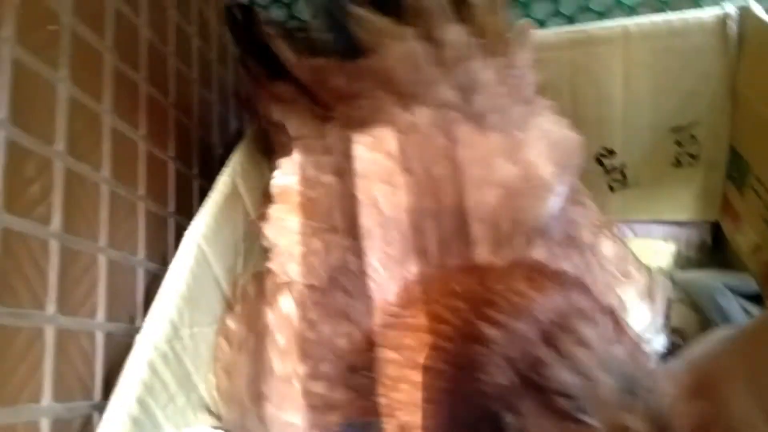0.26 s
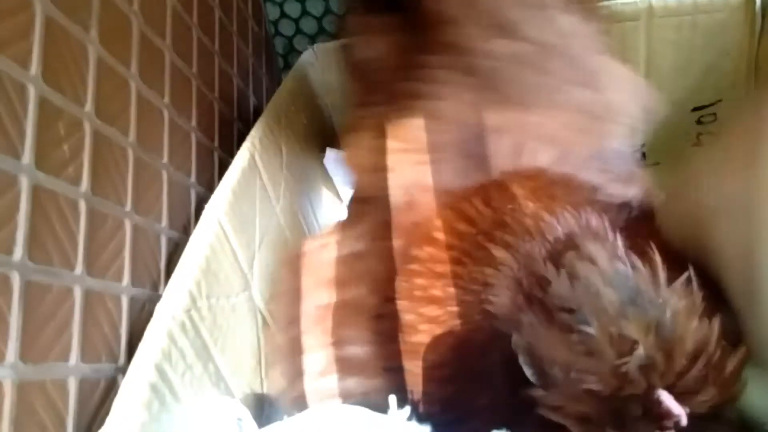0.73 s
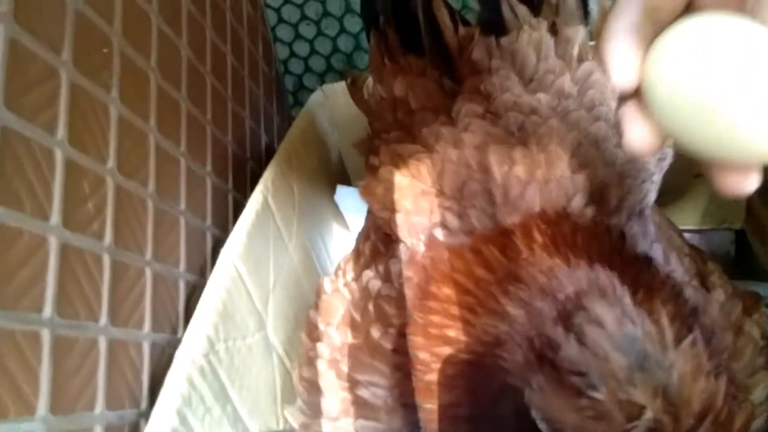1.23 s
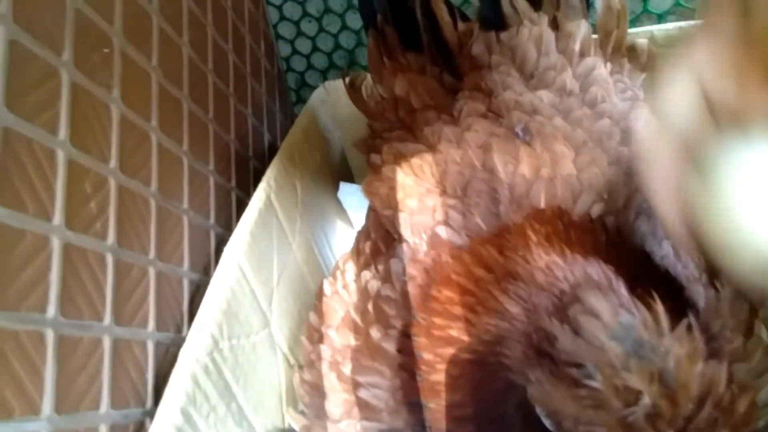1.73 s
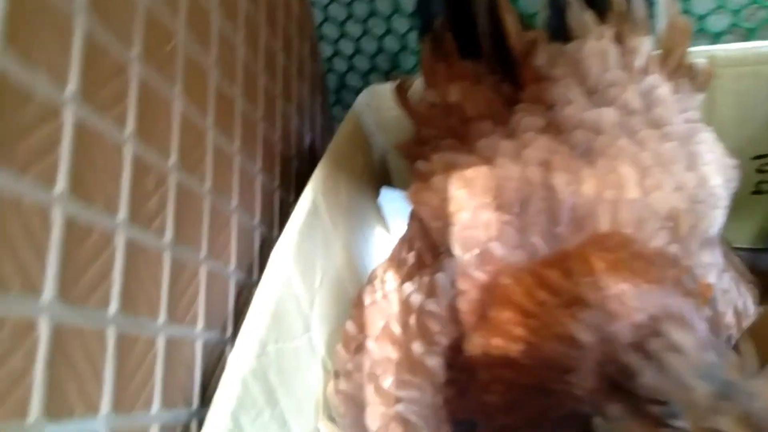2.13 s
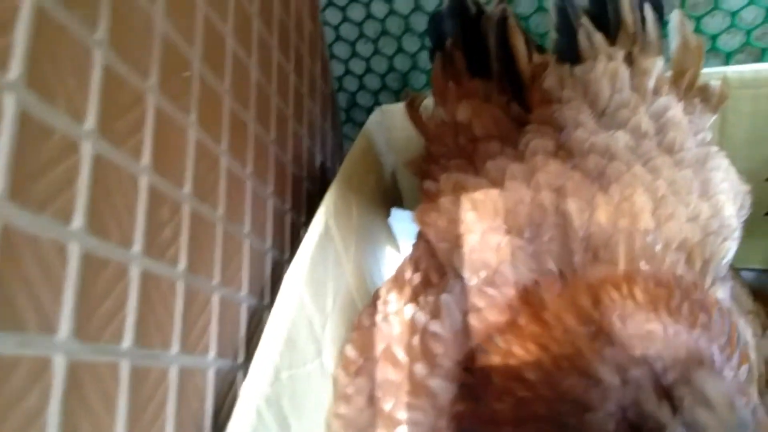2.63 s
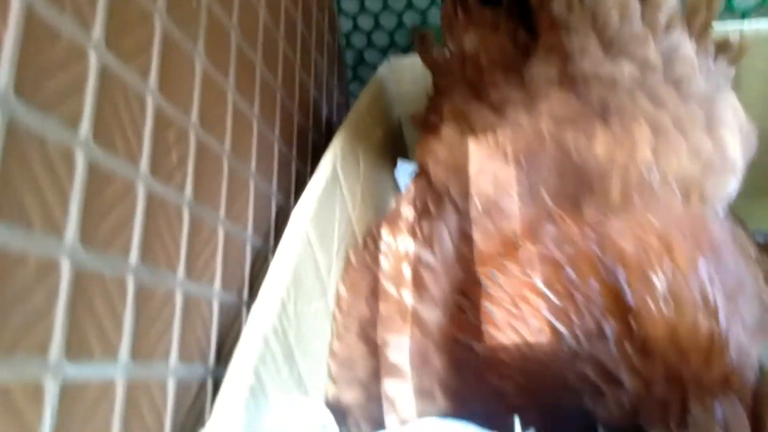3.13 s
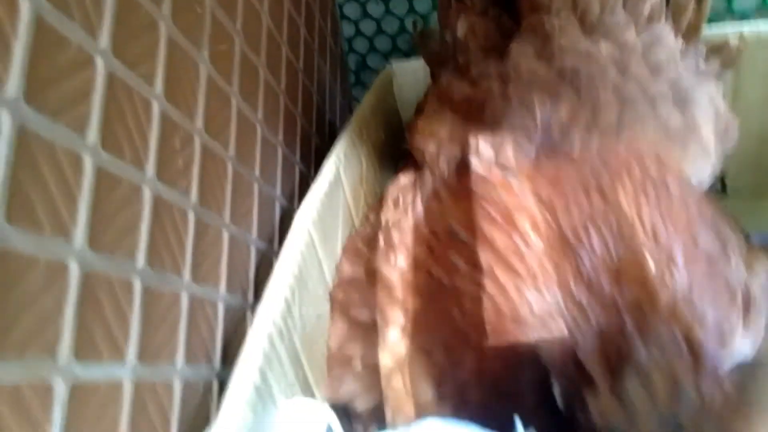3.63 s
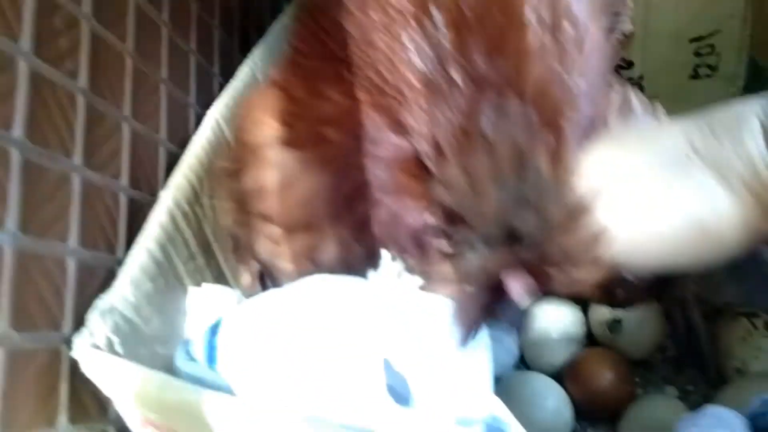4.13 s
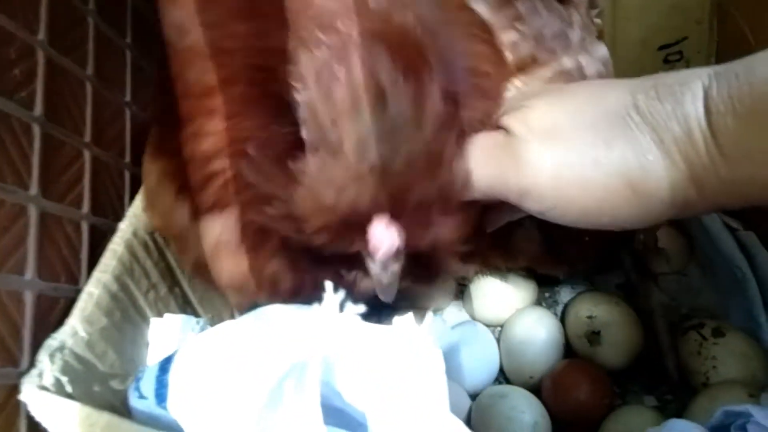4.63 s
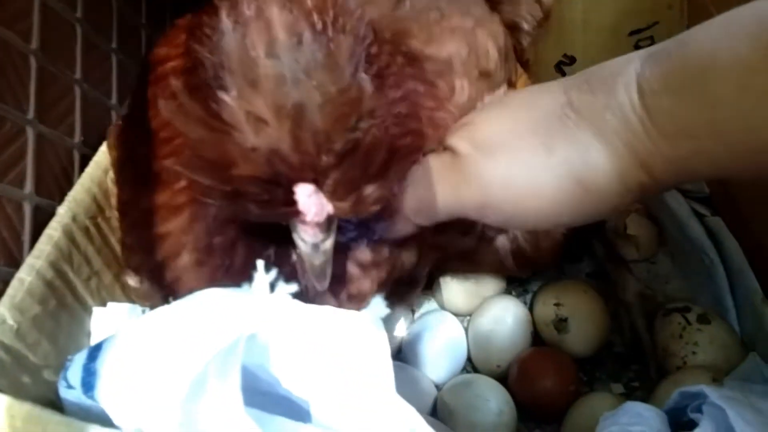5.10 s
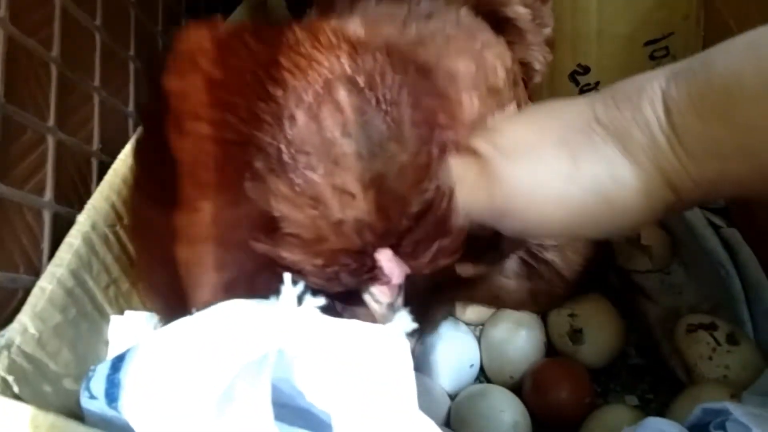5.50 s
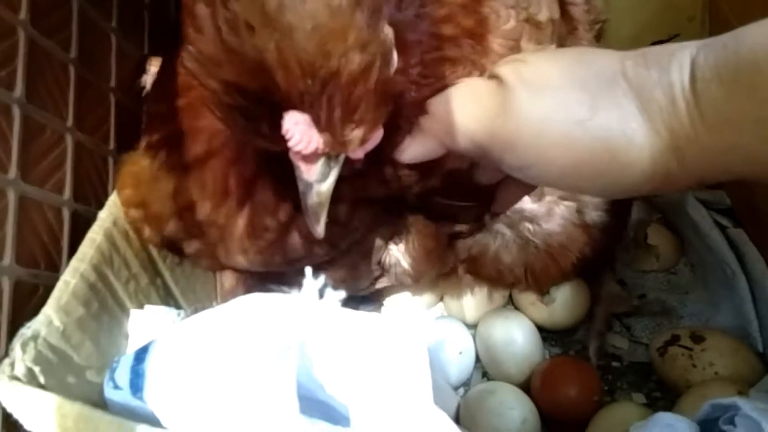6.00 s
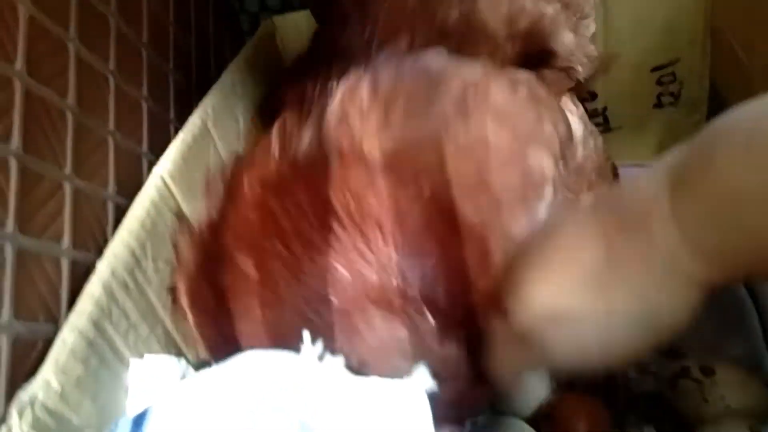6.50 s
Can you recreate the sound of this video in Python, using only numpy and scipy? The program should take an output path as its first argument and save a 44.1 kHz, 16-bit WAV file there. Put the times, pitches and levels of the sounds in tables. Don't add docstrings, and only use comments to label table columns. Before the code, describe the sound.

The sound opens mid-cluck: a hen very close, low and throaty, each short note growling, climbing clearly and dropping. Cicadas hiss high and steadily over traffic rumble and wavering motor hum throughout. From 0.2 s chicks whistle sharp gliding peeps, some loud, some soft; the box bumps dully at 0.2 and 0.85 s, and eggs and straw tick, sharply at 0.6. Distant dogs yap, clustering near 1.1 s as a faint cricket starts whirring in bouts. A far rooster gives one hoarse falling wail at 1.6-1.95 s, and traffic swells around 2.4 s. Clucks return at 2.5, 2.9 and 3.3 s, then from 3.9 s break to a higher top note. Peeps crowd in around 4.3-5.1 s. Dogs bark on, with a strong woof at 5.4 s and howls after 6 s. An egg tick sounds at 6.0 s; a last weak cluck and long warbled peep end it near 6.7 s.

```python
import sys
import numpy as np
from scipy import signal
from scipy.fft import rfft, irfft
from scipy.io import wavfile
from scipy.ndimage import uniform_filter1d, map_coordinates

SR = 44100
rng = np.random.default_rng(int(sys.argv[2]) if len(sys.argv) > 2 else 0)


def wav_out(sig):
    wavfile.write(sys.argv[1], SR, np.round(np.clip(np.atleast_2d(sig).T, -1, 1) * 32767).astype(np.int16))


def volts(x):
    e = np.asarray(x, float) / 20
    return 10 ** e


N = 297675
TIME = np.arange(N) / SR


def unit(x):
    return x / np.sqrt(np.mean(x ** 2) + 1e-20)


def along(points, hz):
    f, v = np.transpose(points)
    return np.interp(np.log(hz + 1), np.log(f + 1), v)


def wobble(rate, count=N):
    knots = rng.standard_normal(int(count * rate / SR) + 4)
    return map_coordinates(knots, [np.arange(count) * rate / SR])


def hiss(spectrum, patchy_db):
    hz, _, z = signal.stft(rng.standard_normal(N + 2048), SR, nperseg=2048)
    patches = uniform_filter1d(rng.standard_normal(z.shape), size=12, axis=0)
    patches = unit(uniform_filter1d(patches, size=3, axis=1))
    gain_db = patchy_db * patches + along(spectrum, hz)[:, None]
    return unit(signal.istft(z * volts(gain_db), SR, nperseg=2048)[1][:N])


def add(track, s, sound):
    start = round(s * SR)
    part, sound = track[max(start, 0):], sound[max(-start, 0):]
    part[:len(sound)] += sound[:len(part)]


def note(rows, fade):
    s, hz, db = np.transpose(rows)
    t = np.arange(s[0], s[-1] + fade, 1 / SR)
    to_edge = np.minimum(t - s[0], s[-1] + fade - t)
    edge = np.sin(np.pi / 2 * np.clip(to_edge / fade, 0, 1)) ** 2
    pitch_hz = uniform_filter1d(np.interp(t, s, hz), size=130)
    return pitch_hz, edge * volts(uniform_filter1d(np.interp(t, s, db), size=60))


def voice(hz, tract, tilt_db, uneven_db, count):
    k = np.arange(1, count + 1)[:, None]
    flicker = np.array([wobble(120, count=len(hz)) for _ in k])
    gains = volts(along(tract, k * hz) + tilt_db * np.log2(k) + uneven_db * flicker)
    lag = sum(np.arctan2(220 * k * hz, c ** 2 - (k * hz) ** 2) for c in (560, 920))
    overtones = gains * np.cos(2 * np.pi * k * np.cumsum(hz) / SR - lag)
    return np.sqrt(2 / np.sum(gains ** 2, axis=0)) * np.sum(overtones, axis=0)


# pitch_hz, t60_s
YARD_DECAY = [(400, .46), (1500, .5), (3500, .44)]


def yard(x):
    hz, t, z = signal.stft(rng.standard_normal(SR // 2), SR, nperseg=256)
    decay_db = -60 * t / along(YARD_DECAY, hz)[:, None]
    tail = signal.istft(z * volts(decay_db), SR, nperseg=256)[1]
    return signal.fftconvolve(x, tail / np.linalg.norm(tail))


# start_s, level_db
TRAFFIC_LEVEL = [
    (0, -53),
    (2.1, -56),
    (2.4, -47),
    (3, -54),
    (6.75, -55.5),
]
# pitch_hz, level_db per Hz
TRAFFIC_COLOUR = [(25, -62), (55, -12), (75, -22), (100, -3), (117, -7), (134, 0), (200, -11.5), (300, -19),
                  (500, -57)]
CICADA_COLOUR = [(3060, -88), (5200, -28.5), (5720, -22.5), (6370, -9.5), (6970, -3), (8650, 3),
                 (9300, -2.5), (11500, -26.5), (15300, -35)]
AIR_COLOUR = [(150, -20.5), (250, -2.5), (1670, -13.5), (2400, -16.5), (3040, -14), (3650, -21),
              (5600, -26), (7280, -56), (12300, -120)]
# pitch_hz, level_db
MOTORS = [
    (102, -63.5),
    (132, -60),
]


def background():
    cicadas = volts(-45.5 + 0.2 * wobble(13)) * hiss(CICADA_COLOUR, patchy_db=0.5)
    traffic_db = np.interp(TIME, *np.transpose(TRAFFIC_LEVEL)) + 1.5 * wobble(9)
    traffic = volts(traffic_db) * hiss(TRAFFIC_COLOUR, patchy_db=-1.0)
    hum = np.zeros(N)
    for hz, db in MOTORS:
        turn = 2 * np.pi * hz * np.cumsum(1 + 0.0298 * wobble(6)) / SR
        hum += volts(db + 6.2 * wobble(4)) * np.sin(turn)
    air = volts(-59 + wobble(3.035)) * hiss(AIR_COLOUR, patchy_db=1.4)
    return hum + cicadas + traffic + air


# start_s, length_s, level_db
CRICKET_BOUTS = [
    (1.09, .1, -56),
    (1.56, .3, -60),
    (1.93, .22, -62),
    (2.486, .16, -59),
    (2.82, .3, -61),
    (4.0, .38, -68.5),
    (5.52, .4, -61),
    (6.14, .2, -76),
]


def cricket():
    colour = [(2780, -45), (2900, -11), (2990, 0), (3080, -11), (3250, -45),
              (4800, -45), (5040, -17), (5300, -50)]
    whir = hiss(colour, patchy_db=1)
    bouts = volts(-76)
    for s, length, db in CRICKET_BOUTS:
        bouts = bouts + volts(db) * np.clip(np.minimum(TIME - s, s + length - TIME) / .05, 0, 1)
    return bouts * volts(2.2 * wobble(22)) * whir


# start_s, pitch_hz, level_db
ROOSTER_WAIL = [
    (1.598, 1455, -50),
    (1.612, 1480, -41),
    (1.67, 1525, -38),
    (1.72, 1505, -39),
    (1.742, 1500, -52),
    (1.765, 1450, -36),
    (1.834, 1375, -34),
    (1.88, 1225, -42),
    (1.95, 1140, -54),
]


def rooster():
    out = np.zeros(N)
    hz, gain = note(ROOSTER_WAIL, fade=0.0088)
    turn = 2 * np.pi * np.cumsum(hz * (1 + 0.018 * wobble(130.0, count=len(hz)))) / SR
    tone = np.sin(turn) + volts(-27) * np.sin(2 * turn)
    cry = gain * volts(3.5 * wobble(60, count=len(hz))) * tone
    add(out, ROOSTER_WAIL[0][0], cry)
    add(out, ROOSTER_WAIL[0][0], volts(-1.5) * yard(cry))
    return out


# pitch_hz, level_db
DOG_MOUTH = [(250, -40), (400, -14), (570, 0), (740, -10), (1100, -1), (1600, 2), (2150, -4), (2450, -16),
             (2850, -15), (3250, -21), (3700, -36), (6000, -80)]
BIG_MOUTH = [(300, -30), (570, -2), (850, -4), (1250, 0), (1550, 0), (2000, -6), (2250, -26), (3300, -24),
             (4100, -30), (6000, -80)]
DARK_MOUTH = [(250, -40), (400, -12), (570, -1), (760, -6), (1100, 0), (1400, -9), (1900, -15), (2300, -26),
              (2800, -17), (3300, -20), (3800, -36), (6000, -80)]
RASP_MOUTH = [(1500, -40), (2300, -16), (2750, 0), (3200, -2), (3600, -16), (4200, -40), (6000, -80)]
# start_s, pitch_hz, level_db, hoarse_0_to_1, bright_db per octave
YIPS = [(0.284, 566, -57, 0.9, 3), (1.135, 710, -36, 0.18, -1), (3.072, 622, -67, 0.83, -1),
        (5.53, 697, -47.5, 0.25, -20), (6.395, 610.6, -43.5, 0.18, -17.5), (6.678, 578, -46.5, 0.34, -10)]
YAPS = [(.763, 519, -56.5, 0.75, -5.5), (1.14, 550, -41, 0.17, 2), (1.87, 450.5, -47.5, 0.35, -2),
        (4.034, 603, -48, 0.25, -13.5), (1.165, 553, -47, .05, -20), (1.17, 770, -56, .5, 4)]
BAYS = [(1.06, 545, -53, 0.8, -4), (2.278, 515, -55, 1, -11), (2.469, 547.7, -46.5, 0.35, -7),
        (2.46, 672, -53, 0.2, 2), (4.078, 494, -48, .2, -6.5), (4.385, 465, -47.5, .18, -5),
        (3.272, 590, -44, .6, -4), (4.47, 925, -55, .2, -2)]
WOOFS = [
    (5.418, 622, -43, .55, -5),
    (5.44, 516, -35, .6, 0),
]
HOWLS = [(6.089, 616, -44.5, .25, -3), (6.195, 553, -46, .3, -3), (6.44, 517, -44.5, .18, -1),
         (6.43, 750, -48, .4, -10), (3.7, 610, -46.5, .4, -1), (3.735, 558, -47, .22, 3),
         (4.11, 612, -53, .3, 2), (5.86, 640, -58, .9, 0)]
RASPS = [(3.27, 590, -57, .7, 0), (3.7, 560, -57, .6, 0), (6.14, 550, -62, .8, 0), (6.48, 520, -62, .8, 0),
         (2.48, 550, -61, .7, 0), (4.4, 470, -63, .7, 0), (4.1, 500, -64, .8, 0), (5.43, 640, -62, .8, 0)]


def dogs():
    out = np.zeros(N)
    kinds = [(.085, DOG_MOUTH, YIPS), (.145, DOG_MOUTH, YAPS), (.2, DOG_MOUTH, BAYS),
             (.095, BIG_MOUTH, WOOFS), (.13, DARK_MOUTH, HOWLS), (.2, RASP_MOUTH, RASPS)]
    for length, mouth, calls in kinds:
        for s, *call in calls:
            yap = bark(length, mouth, *call)
            add(out, s, volts(-4) * yap)
            add(out, s, yard(yap))
    return out


def bark(length, mouth, pitch_hz, db, hoarse, bright_db):
    u = np.arange(round(length * SR)) / (length * SR)
    count = len(u)
    hoarse = np.clip(hoarse, 0, 1)
    arch = 1 - 0.1 * (u - .45) ** 2
    hz = pitch_hz * (arch + (0.0031 + 0.0303 * hoarse) * wobble(70.7, count=count))
    tone = voice(hz, mouth, bright_db, uneven_db=2.2, count=7)
    breath = rng.standard_normal(count) * (1 + 3.5 * np.cos(2 * np.pi * np.cumsum(hz) / SR))
    grid = np.fft.rfftfreq(count, 1 / SR)
    colour_db = along(mouth, grid) + bright_db * np.log2(grid / pitch_hz + 0.29)
    breath = unit(irfft(rfft(breath) * volts(colour_db), count))
    swell = np.sin(np.pi * u ** 0.61) ** 1.1
    rough = volts(3.1 * hoarse * wobble(57.7, count=count))
    return volts(db) * swell * rough * (np.sqrt(1 - hoarse) * tone + np.sqrt(hoarse) * breath)


# start_s, peak_db, ring_hz, crack_db
TICKS = [(.6, -34, 855, -28), (.628, -23, 630, -32), (.643, -44, 806, -30), (.745, -48, 900, -23),
         (0.712, -42, 1370, -4), (1.059, -38.5, 1400, -30), (1.782, -45, 1100, -5),
         (2.081, -30.5, 945, -17), (2.087, -35, 1370, -14), (2.284, -39.5, 1220, -28),
         (2.874, -32.5, 1300, -11), (3.564, -38, 2280, -28), (3.987, -38, 795, -37), (4.579, -35, 900, -28),
         (4.752, -30, 1235, -31), (5.674, -39, 820, -10), (5.675, -41, 1400, -20), (2.876, -36, 1000, -20),
         (4.392, -42, 2150, -25), (4.697, -42, 2160, -35), (2.405, -46, 900, -20), (3.556, -44, 1300, -30),
         (5.198, -46, 800, -30), (5.986, -44, 1260, -13), (6.012, -25, 900, -24)]
# start_s, peak_db
BUMPS = [
    (0.197, -39.5),
    (0.855, -34),
]


def nest():
    out, t = np.zeros(N), np.arange(SR // 10) / SR
    touch = 1 - np.exp(-(t / .001) ** 2)
    crackle_band = signal.butter(4, [1700, 4300], "band", fs=SR, output="sos")
    for s, db, ring_hz, crack_db in TICKS:
        ring = np.sin(2 * np.pi * ring_hz * t) + 0.5 * np.sin(2 * np.pi * 1.62 * ring_hz * t)
        crack = signal.sosfilt(crackle_band, rng.standard_normal(len(t)))
        tick = volts(-60 * t / .016) * ring + volts(crack_db + 11 - 60 * t / .025) * crack
        add(out, s, volts(db) * touch * tick)
    for s, db in BUMPS:
        push = 1 - np.exp(-t / 0.0024)
        add(out, s, volts(db + 3.0 - 60 * t / 0.1) * push * np.sin(2 * np.pi * 105 * t))
    return out


def rise(s, lead, start_hz, knee_hz, db, top_hz, sag_hz, bow, top_db, throat):
    sweep, lead_db, hook, fade_db = throat
    shoulder_hz = top_hz - 200
    climb_hz = shoulder_hz - knee_hz
    top = s + climb_hz / sweep
    peak_db = db + top_db
    return [(s - lead, start_hz, db + lead_db),
            (s - lead * (1 - .45), start_hz + .72 * (knee_hz - start_hz), db + lead_db / 2),
            (s, knee_hz, db),
            ((s + top) / 2, knee_hz + bow * climb_hz, db),
            (top, shoulder_hz, db + .8 * top_db),
            (top + .3 * hook, top_hz, peak_db),
            (top + .62 * hook, top_hz - sag_hz / 4, peak_db + fade_db / 3),
            (top + hook, top_hz - sag_hz, peak_db + fade_db)]


def fall(s, length, from_hz, to_hz, db):
    peak = 0.4
    u = np.sort(np.append(np.linspace(0, 1, num=6), peak))
    swell_db = np.interp(u, [0, peak, 1], [-14, 0, -5])
    bend = 1 if from_hz > 4700 else 1.7
    return np.transpose([s + length * u, to_hz + (from_hz - to_hz) * (1 - u) ** bend, db + swell_db])


# knee_s, lead_in_s, start_hz, knee_hz, level_db
LOUD_CHICK = [(0.2, 0.02, 2470, 2780, -43), (0.499, 0.03, 2940, 3430, -38),
              (0.821, 0.035, 2720, 3500, -47.5), (1.05, 0.022, 3540, 3790, -47),
              (2.342, 0.023, 2640, 2910, -49), (2.85, 0.02, 2350, 3020, -42),
              (3.106, 0.024, 3200, 3860, -40), (3.526, .025, 2590, 3270, -44.5),
              (4.344, 0.023, 2390, 2890, -38), (4.597, 0.024, 3380, 3870, -47.5),
              (5.115, 0.025, 2630, 3100, -42.5), (5.398, 0.019, 3200, 3590, -45.5),
              (5.831, 0.035, 2790, 3480, -40.5)]
SOFT_CHICK = [(.258, 0.019, 2310, 2350, -53.5), (0.671, 0.0021, 2390, 2430, -52),
              (1.439, 0.027, 2260, 2400, -56), (1.999, 0.014, 2270, 2510, -54.5),
              (0.705, .004, 2500, 2650, -60), (4.41, 0.019, 2300, 2530, -56.5),
              (4.947, .01, 2330, 2540, -62)]
# top_hz, sag_hz, climb_share at half time, top_db
LOUD_HOOKS = [(4760, 150, .72, -20), (5080, 900, .5, -16), (5200, 250, .55, -19), (4900, 200, .55, -14),
              (4780, 450, .55, -19), (4900, 500, .58, -17), (5020, 600, .5, -17), (4960, 300, .5, -14),
              (4800, 300, .6, -19), (4850, 300, .5, -17), (4850, 500, .5, -21), (4920, 350, .6, -19),
              (4900, 450, .5, -19)]
SOFT_HOOK = (4100, 400, .62, -6)
# sweep_hz per s, lead_in_db, hook_s, hook_fade_db
LOUD_THROAT = (74000, -10, .02, -9)
SOFT_THROAT = (72000, 2, .028, -9)
# start_s, length_s, from_hz, to_hz, level_db
FALLS = [(0.586, 0.035, 3150, 2520, -57), (0.837, 0.062, 3900, 2670, -47), (2.289, 0.063, 4890, 3700, -56),
         (3.235, 0.045, 3600, 3320, -59), (4.267, 0.045, 3500, 2570, -47), (4.37, 0.024, 3900, 3350, -53),
         (4.529, 0.061, 3760, 2606, -42.5), (4.879, 0.077, 4100, 2630, -43.5),
         (4.872, .012, 4550, 4150, -61), (0.144, 0.036, 2950, 2860, -52), (4.632, 0.029, 2970, 2860, -55),
         (5.833, 0.021, 2820, 2800, -57), (0.449, .04, 2730, 2740, -61), (0.766, 0.036, 3830, 3800, -63),
         (0.82, 0.019, 2930, 3050, -53), (0.558, .03, 2760, 3010, -62), (2.826, .022, 4850, 5600, -59),
         (4.887, 0.033, 2890, 3050, -50.5)]
FAR_BIRDS = [(.455, .042, 4220, 4300, -70), (1.502, .03, 3010, 2700, -68), (1.545, .03, 2900, 3700, -67),
             (2.745, .025, 3950, 3700, -70), (2.79, .06, 3180, 3050, -64), (.535, .02, 3050, 2800, -66),
             (3.655, .04, 4600, 4100, -72), (3.69, .05, 3850, 3600, -67), (4.007, .088, 2850, 2850, -65),
             (4.97, .055, 3950, 4400, -71), (5.25, .04, 4600, 4050, -68), (5.29, .02, 3900, 3000, -72),
             (5.235, .025, 2900, 3200, -66), (5.11, .06, 2550, 2850, -66), (5.055, .03, 3650, 3400, -70),
             (5.325, .055, 4000, 3600, -69), (6.42, .065, 3900, 3250, -66), (6.585, .05, 5200, 4500, -70),
             (6.215, .035, 3800, 3750, -66), (6.16, .06, 3000, 3500, -68), (4.03, .07, 2950, 2500, -67),
             (1.85, .025, 2600, 2480, -64), (6.36, .025, 2750, 2900, -67), (5.44, .06, 3500, 3100, -63),
             (3.195, .04, 3900, 3650, -71)]
# start_s, pitch_hz, level_db
WARBLE = [(6.635, 2850, -48), (6.645, 2950, -43), (6.662, 2560, -45), (6.682, 2400, -43),
          (6.695, 3350, -38), (6.712, 4150, -56), (6.722, 3700, -54), (6.73, 3200, -47), (6.737, 3000, -52)]
SLIDES = [
    [(2.626, 5000, -64), (2.655, 4200, -55), (2.68, 4050, -52), (2.706, 3100, -62)],
    [(.626, 2600, -59), (.638, 3400, -62), (.652, 3800, -59), (.662, 3750, -64)],
    [(4.8, 2950, -66), (4.822, 3310, -60), (4.862, 3150, -61), (4.88, 2880, -62)],
    [(3.808, 3400, -60), (3.822, 3950, -55), (3.83, 3900, -56), (3.845, 3500, -60)],
]


def peeps():
    loud = [rise(*peep, *hook, LOUD_THROAT) for peep, hook in zip(LOUD_CHICK, LOUD_HOOKS)]
    soft = [rise(*peep, *SOFT_HOOK, SOFT_THROAT) for peep in SOFT_CHICK]
    falls = [fall(*peep) for peep in FALLS]
    far = [[(s, a, db), (s + length, b, db)] for s, length, a, b, db in FAR_BIRDS]
    return loud + soft + falls + far + [WARBLE] + SLIDES


def chicks():
    near, far = np.zeros(N), np.zeros(N)
    for rows in peeps():
        hz, gain = note(rows, fade=.003)
        distant = gain.max() < volts(-60)
        track, shake, flutter_db = (far, .013, 4) if distant else (near, .008, 2.3)
        turn = 2 * np.pi * np.cumsum(hz * (1 + shake * wobble(250, count=len(hz)))) / SR
        flutter = volts(flutter_db * wobble(150, count=len(hz)))
        octave = volts(-22 - (hz - 2450) / 40) * np.sin(2 * turn)
        add(track, rows[0][0], np.sqrt(2) * gain * flutter * (np.sin(turn) + octave))
    return near + far + volts(-7) * yard(far)[:N]


def cluck(s, growl, climb, drop, top_hz, growl_db, climb_db, top_db, slap_db):
    rest_hz, crest_hz = 235, 640
    jump = s + growl
    crest = jump + climb
    rows = [(s, rest_hz, growl_db - 7), (s + .007, rest_hz + 25, growl_db),
            (jump - .002, 345, growl_db - 2), (jump + .002, 460, climb_db)]
    if top_hz > 660:
        rows += [(crest - .006, crest_hz - 50, climb_db - 2), (crest, crest_hz, climb_db - 9),
                 (crest + .1 * drop, crest_hz, climb_db - 16),
                 (crest + .25 * drop, top_hz, top_db),
                 (crest + .58 * drop, .8 * top_hz, (top_db + slap_db) / 2 - 1)]
    else:
        rows += [(crest, top_hz, top_db), (crest + .3 * drop, .85 * top_hz, top_db)]
    return rows + [(crest + .76 * drop, rest_hz + 70, slap_db), (crest + drop, rest_hz, slap_db - 6)]


# start_s, growl_s, climb_s, drop_s, top_hz
CLUCKS = [(-.022, .024, .018, .022, 880), (.312, .023, .021, .016, 670), (.674, .026, .013, .015, 670),
          (1.133, .029, .017, .007, 560), (2.498, .026, .018, .012, 565), (2.896, .029, .021, .014, 595),
          (3.297, .028, .027, .011, 630), (3.888, .016, .03, .019, 900), (4.329, .019, .022, .028, 930),
          (4.695, .018, .023, .024, 860), (5.041, .015, .025, .026, 900), (5.463, .02, .022, .019, 780),
          (6.133, .018, .019, .027, 900), (6.612, .01, .024, .024, 800)]
# growl_db, climb_db, top_db, closing_slap_db
EFFORT = [(-30, -27.5, -31.5, -32), (-35, -27.5, -43, -30), (-34, -29, -45, -33),
          (-31.5, -32.5, -28.5, -32), (-33.5, -34, -32, -28.5), (-29, -33.5, -28, -28.5),
          (-29, -26.5, -28, -28.5), (-31, -29, -38.5, -35), (-33, -33.5, -39.5, -30),
          (-32.5, -31.5, -48, -35), (-34.5, -30.5, -39.5, -29), (-35, -32, -31, -33.5),
          (-35, -33.5, -33, -31), (-39, -35.5, -51, -39.5)]
THROAT_RING = [11, 8, 7, -3, 2, 2, 4, 5, 11, 7, 3, 2, 5, 0]


def hen():
    out = np.zeros(N)
    for timing, levels_db, ring_db in zip(CLUCKS, EFFORT, THROAT_RING):
        rows = cluck(*timing, *levels_db)
        start = rows[0][0]
        hz, gain = note(rows, fade=.003)
        count = len(hz)
        slack = np.clip((500 - hz) / 200, 0, 1)
        hz = hz * (1 + (.015 + .09 * slack) * wobble(240, count=count))
        gain = gain * volts((.8 + 2.5 * slack) * wobble(220, count=count))
        waking_db = 14 * np.clip(3 - np.arange(count) / SR / .002, 0, 1) * (start > 0)
        throat = [(200, 0), (560, 1), (740, ring_db / 2 - 2), (920, ring_db),
                  (1060, ring_db / 2 - 11), (1250, -32), (2500, -46)]
        tilt_db = -10 + 6 * slack - waking_db
        add(out, start - .001, gain * voice(hz, throat, tilt_db, 1 + 3 * slack, count=6))
    dull_top = signal.butter(4, 1300, fs=SR, output="sos")
    return signal.sosfilt(dull_top, out)


def scene():
    far = background() + cricket() + rooster() + dogs()
    near = nest() + chicks() + hen()
    return (near + volts(-18.5) * yard(near)[:N] + far)[None]


def top_cut(x):
    return signal.sosfilt(signal.butter(12, 15410, fs=SR, output="sos"), x)


def record(dry):
    mix = dry * np.minimum(TIME / 0.0011, 1)
    return top_cut(mix)


dry = scene()
out = record(dry)
wav_out(out)
```